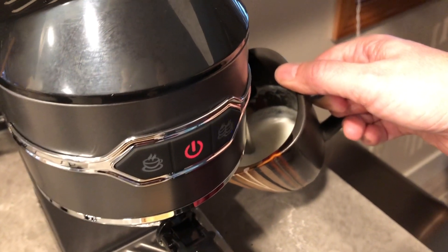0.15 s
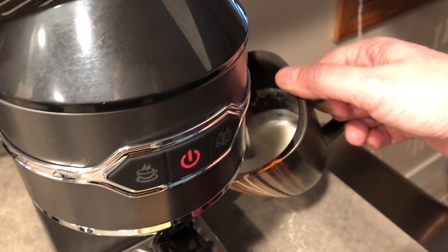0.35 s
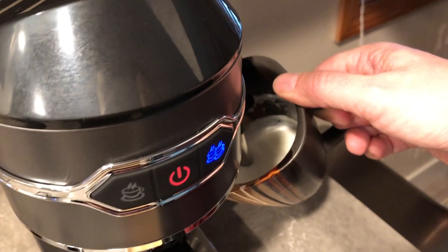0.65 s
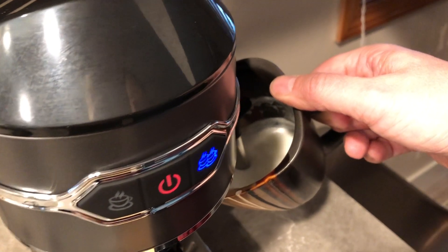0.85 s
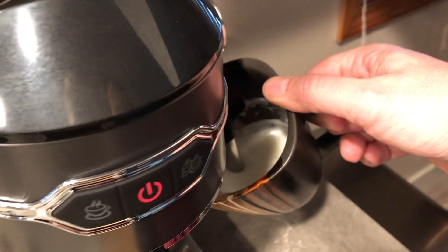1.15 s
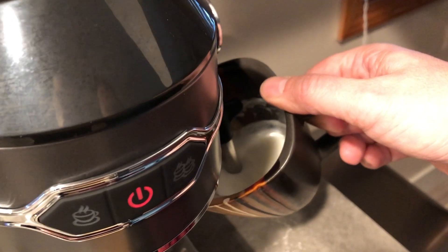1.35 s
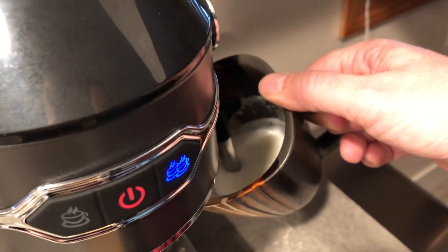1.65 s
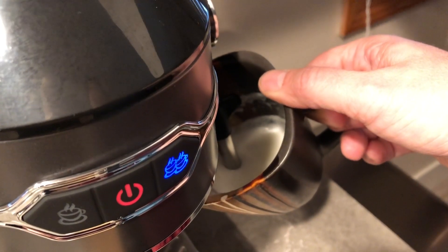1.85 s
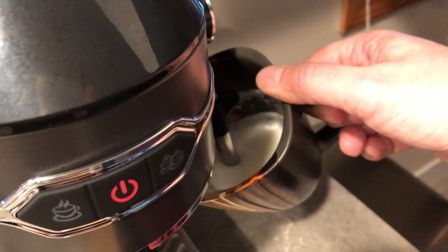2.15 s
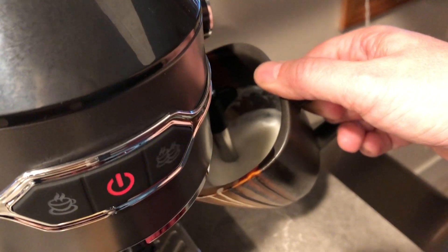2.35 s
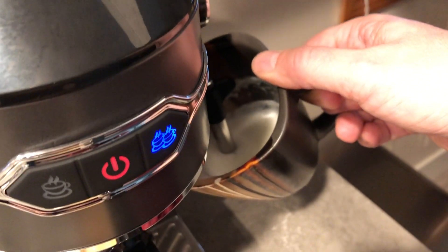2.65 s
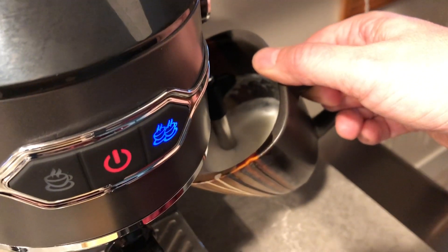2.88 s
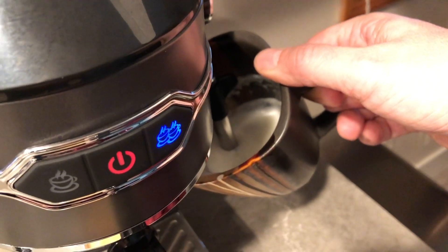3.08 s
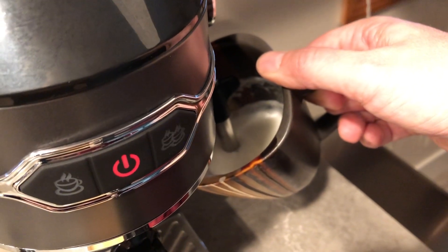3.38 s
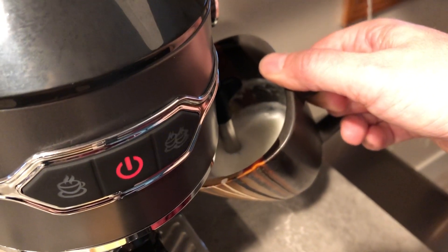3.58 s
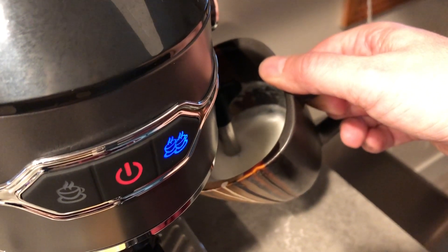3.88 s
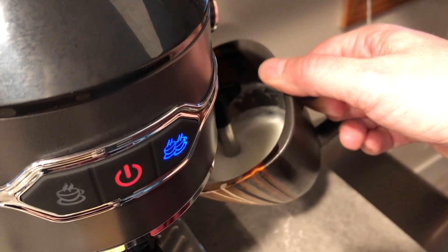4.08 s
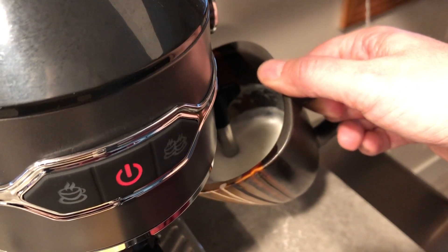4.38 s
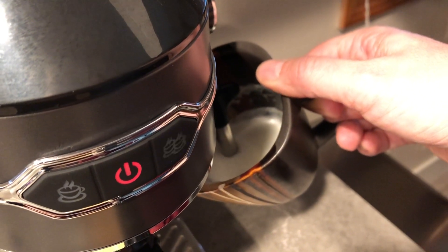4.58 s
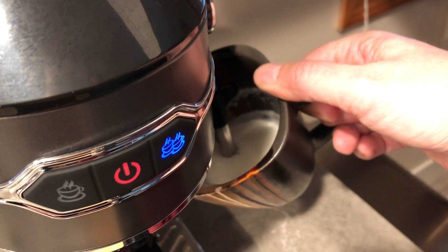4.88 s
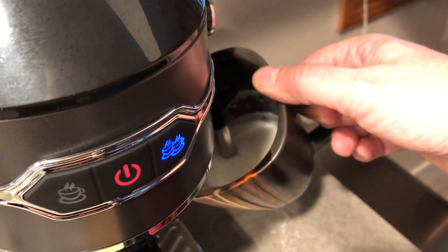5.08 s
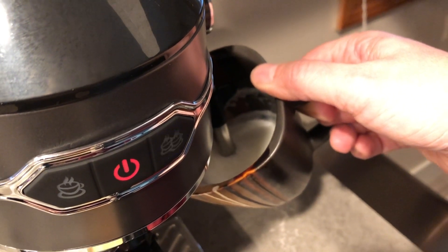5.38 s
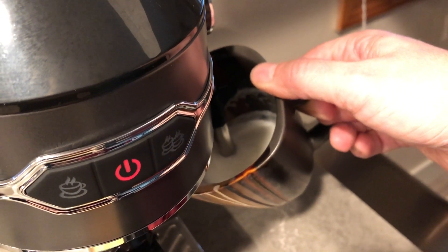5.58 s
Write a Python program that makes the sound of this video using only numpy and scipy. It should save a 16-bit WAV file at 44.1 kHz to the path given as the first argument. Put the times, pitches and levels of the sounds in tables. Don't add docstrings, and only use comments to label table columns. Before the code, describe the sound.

A close phone microphone in a quiet kitchen with little echo and a faint low hush. From 0 to 1 second, water dribbles from a steam wand: irregular, tiny wet ticks and sizzling crackles, many per second, lightly ringing a steel pitcher. Around 1.0 a soft thud, a sharper tick and quick falling plops mark the valve opening. At about 1.15 steam blasts out with a loud, coarse, spitting rasp that clears by 1.5. Until 4.4 the milk froths: steady metallic hiss, bubbling pockets swelling and ringing about eight times a second, gulps, and short bright spits, with faint thuds near 3.7 and 4.05. Around 4.5 the tip sinks; the hiss gets darker and smoother. From 4.75 a squeal near 850 to 900 hertz breaks in, stuttering at first, quickly growing loud, rough and wavering, with a faint octave, dominating until the abrupt stop at about 5.7.

```python
import sys
import numpy as np
from scipy import signal
from scipy.io import wavfile
from scipy.ndimage import uniform_filter1d

SR = 44100
rng = np.random.default_rng(int(sys.argv[2]) if len(sys.argv) > 2 else 0)


def pcm_store(signal):
    levels = np.round(np.clip(np.atleast_2d(signal), -1, 1) * 32767)
    wavfile.write(sys.argv[1], SR, levels.astype(np.int16).T)


def boost_factor(decibels):
    exponent = np.asarray(decibels, float) / 20
    return 10 ** exponent


N = 252693
T = np.arange(N) / SR
HZ = np.fft.rfftfreq(8192, 1 / SR)

# (time [s], flow level [dB], cavity resonance [Hz])
FLOW = [(0, -63.5, 2900), (0.55, -56.5, 2670), (0.78, -59, 2530), (0.9, -53, 2425), (1.135, -50, 2380),
        (1.17, -31.5, 2272), (1.262, -34.5, 2136), (1.275, -31, 1986), (1.405, -30, 2030),
        (1.425, -34.5, 2250), (1.9, -37, 2683), (3, -36.5, 2900), (3.75, -34, 2929), (4.4, -37.5, 2566),
        (4.52, -34, 1814), (4.71, -32.5, 1772), (4.76, -32.5, 1723), (5.73, -25, 1810)]
# (begins [s], takes [s], froth [dB], pocket [dB], fizz [dB])
STAGES = [
    (0, 0.01, -15, -4, -4),
    (1.1, 0.12, -32, -9, -10),
    (1.38, 0.12, -19, -6, -11),
    (4.42, 0.1, -22, -1, -17),
    (4.72, 0.03, -12, 3, -17),
]
SETTLES_S, SINKS_S = 1.6, 4.57
# (frequency [Hz], width [Hz], level [dB])
PITCHER_MODES = [(479, 54, -24), (852, 35, -10), (1770, 80, -13), (2050, 35, -7.5), (2900, 87, -4),
                 (4500, 30, -12), (5414, 145, -9), (6200, 62, -5), (7030, 207, -5), (8470, 140, -10),
                 (10900, 150, -37), (11290, 176, -13.5), (12700, 250, -22), (12900, 77, -14),
                 (13500, 360, -34), (14900, 700, -21)]
# (frequency [Hz], density [dB per Hz])
JET_COLOUR = [(150, -55), (250, -107), (872, -7.5), (1550, -26), (2790, -0.5), (4020, -16.5), (15800, -34)]
# (frequency [Hz], density [dB per Hz])
DEEP_COLOUR = [(180, -101), (300, -69), (699, -32), (868, 0), (1210, -26.5), (1600, -36), (1800, -26.5),
               (2230, -28.5), (3220, -23), (3930, -43), (4340, -29.5), (4880, -36), (7020, -31),
               (15800, -58.5)]

# (centre [s], level [dB], pitch [Hz], length [s])
SPUTTER = [(1.115, -37, 1095, 0.014), (1.145, -30, 1000, 0.0096), (1.16, -24, 990, 0.0088),
           (1.178, -24, 984, 0.011), (1.202, -28.5, 1140, 0.018), (1.225, -24, 1130, 0.01),
           (1.245, -18, 1144, 0.0089), (1.291, -29, 1151, 0.016), (1.424, -28, 1024, 0.022),
           (1.458, -28, 890, 0.028), (1.533, -29, 890, 0.03), (1.602, -30, 901, 0.017)]
# (centre [s], pocket level [dB], cavity level [dB], pocket pitch [Hz], length [s])
SWELLS = [(1.546, -43, -31, 885, 0.029), (1.635, -46, -35, 901, 0.029), (1.719, -34, -38, 950, 0.033),
          (1.81, -39, -37, 952, 0.033), (1.919, -37, -32, 958, 0.026), (2.15, -33, -41, 954, .035),
          (2.34, -33, -42.5, 901, .035), (2.839, -34.5, -45, 870, 0.038), (2.9, -31, -28, 1180, .014),
          (1.946, -56, -31, 900, 0.023), (2.014, -33.5, -32.5, 950, 0.043), (2.191, -36, -33, 950, 0.03),
          (2.271, -33, -31.5, 912, 0.04), (2.399, -33, -57, 1000, 0.052), (2.434, -40, -28, 1050, 0.02),
          (2.552, -27.5, -40, 884, 0.014), (2.614, -29.5, -29, 956, 0.039), (2.742, -30, -28.5, 900, 0.054),
          (2.881, -39, -30.5, 1100, 0.044), (3.019, -35.5, -28, 950, 0.053), (3.237, -30, -29, 1030, 0.045),
          (3.283, -55, -33.5, 1000, 0.013), (3.417, -29, -30.5, 1060, 0.058),
          (3.554, -26.5, -32, 1010, 0.047), (3.674, -31, -29, 1040, 0.03), (3.732, -27.5, -62, 950, .055),
          (3.787, -29.5, -37, 948, 0.022), (3.89, -29, -35, 980, 0.045), (4.038, -28.5, -56, 1047, 0.022),
          (4.174, -29, -28, 924, 0.061), (4.284, -30.5, -29, 1030, 0.063), (4.37, -39, -29, 1000, 0.015),
          (4.572, -30, -57, 1020, 0.094)]
POCKET_GLIDE, POCKET_LAG_S = 0.052, 0.002787
# (centre [s], level [dB], length [s])
CAVITY_RINGS = [
    (4.6, -34, 0.11),
    (4.787, -28.5, 0.08),
]
LIFT_ENDS_S, CLIMB, SAG = 3.8, 1.03, .93
# (centre [s], level [dB], pitch [Hz], length [s])
CAVITY_SHOTS = [(1.160, -26, 1750, 0.0062), (1.177, -32, 3040, 0.011), (1.179, -30, 1900, 0.0048),
                (1.204, -33, 2640, 0.0095), (1.226, -26, 1670, .006), (1.268, -31, 3170, .005),
                (1.272, -20.5, 2570, 0.0073), (1.278, -21, 1820, 0.0099), (1.294, -20, 1890, .006),
                (1.302, -28, 1980, .004), (1.311, -22, 1890, 0.016), (1.323, -18.5, 1980, 0.0057),
                (1.328, -20, 1940, 0.01), (1.344, -22, 2080, .008), (1.355, -22, 2100, 0.0088),
                (1.366, -18, 2000, 0.0082), (1.381, -23, 2120, 0.0044), (1.387, -25, 2050, .006),
                (1.399, -24, 2040, 0.0085), (1.41, -27, 2850, 0.0067), (1.431, -24.5, 1800, .004),
                (1.447, -24.5, 2500, 0.0073), (1.466, -29.5, 1906, .012), (1.988, -26, 2760, .006),
                (2.435, -21.5, 2866, 0.0095), (2.606, -28, 3020, 0.007), (2.873, -19, 2962, .012),
                (4.765, -29, 1757, .012), (4.827, -23.5, 1710, .012)]
# (time [s], level [dB])
BURSTS = [(1.589, -57), (1.781, -56), (1.864, -49), (1.973, -46.5), (2.079, -44), (2.196, -46),
          (2.302, -44.5), (2.441, -51), (2.547, -47.5), (2.665, -44.5), (2.791, -44), (2.945, -42.5),
          (3.06, -44.5), (3.159, -43), (3.207, -54), (3.311, -43.5), (3.471, -40.5), (3.63, -42.5),
          (3.709, -40.5), (3.825, -39.5), (3.949, -46.5), (4.051, -41), (4.216, -44), (4.362, -45),
          (4.454, -44.5), (4.701, -44.5)]
GULP_LAG_S, GULP_S = 0.034, 0.05

# (time [s], pitch [Hz])
SQUEAL_PITCH = [(4.73, 849), (5.0, 850.7), (5.1, 878), (5.3, 890.5), (5.4, 909), (5.47, 884), (5.53, 903.6),
                (5.58, 855), (5.72, 846.6)]
SQUEAL_DB, SQUEAL_WEAK_DB, SQUEAL_GROWS_S = -22.5, -7, 0.2
# (centre [s], level [dB], length [s])
SURGES = [(4.748, -21, 0.013), (4.801, -16, 0.0079), (4.818, -18.5, 0.014), (4.839, -15.5, .012),
          (4.867, -15, 0.0079), (4.884, -18, 0.012), (4.901, -13, 0.0083), (4.921, -14.5, .012),
          (4.942, -16, 0.0082), (4.96, -26, 0.01), (4.988, -17, .015), (5.014, -20.5, .012),
          (5.034, -12.5, 0.014), (5.066, -9.5, .016), (5.088, -13.5, .017), (5.125, -12, 0.023),
          (5.158, -13, 0.034), (5.19, -14, 0.047), (5.232, -11, 0.024), (5.253, -13, 0.019),
          (5.281, -14.5, 0.022), (5.302, -19, .01), (5.331, -12, 0.037), (5.368, -12, 0.04),
          (5.411, -15, 0.015), (5.426, -13, 0.006), (5.455, -10.5, 0.025), (5.478, -13, .006),
          (5.495, -15, .015), (5.523, -12.5, .018), (5.542, -10.5, .01), (5.562, -6.5, 0.01),
          (5.586, -11, 0.0176), (5.616, -9.5, 0.018), (5.632, -10, 0.0055), (5.648, -12, 0.007),
          (5.672, -11, 0.024), (5.692, -8, 0.0072), (5.704, -17, 0.0042), (5.721, -11.5, .011)]
# (frequency [Hz], width [Hz], start level [dB], end level [dB])
SQUEAL_SKIRTS = [
    (593.5, 125, -40.5, -44.5),
    (1060, 137, -35.5, -33),
    (1380, 250, -38.5, -35.5),
]

# (centre [s], level [dB], length [s])
BLAST_SPITS = [(1.17, -51, 0.0052), (1.172, -35, 0.0087), (1.204, -36, 0.015), (1.222, -38, 0.0082),
               (1.275, -35, 0.011), (1.297, -44, .006), (1.307, -36.5, 0.011), (1.325, -42, .015),
               (1.345, -46, 0.0092), (1.362, -37, 0.011), (1.384, -42, 0.008), (1.402, -40, 0.0082),
               (1.41, -54, .006), (1.45, -46.5, .006), (1.479, -41, 0.022)]
# (onset [s], top peak level [dB], body level [dB])
PUFFS = [(1.502, -31, -41.5), (1.5671, -39, -40), (1.5801, -40, -41.5), (1.5996, -37, -48),
         (1.663, -40, -43.5), (1.6854, -31, -39), (1.749, -37, -40), (1.779, -38, -43), (1.834, -43, -42.5),
         (1.865, -29, -43), (1.968, -39, -42), (2.057, -40, -40), (2.083, -40.5, -40.5),
         (2.194, -38, -40.5), (2.2496, -43, -43.5), (2.2815, -32, -41), (2.314, -37.5, -39),
         (2.3443, -50, -42), (2.4028, -47, -49), (2.445, -37, -39), (2.487, -36, -39.5),
         (2.532, -39, -37.5), (2.5671, -43, -41.5), (2.6213, -42, -42), (2.6405, -33, -38),
         (2.665, -29, -37.5), (2.682, -32, -40), (2.7759, -31, -37.5), (2.824, -39, -43.5),
         (2.9166, -41, -35), (2.935, -39, -38.5), (2.96, -34, -39), (3.0411, -32, -39.5),
         (3.0763, -33, -41), (3.1019, -44, -56), (3.1531, -37, -42), (3.2077, -39.5, -37),
         (3.2598, -33, -40.5), (3.3075, -33, -38), (3.4578, -37, -42), (3.469, -33, -39.5),
         (3.494, -36.5, -38.5), (3.622, -32, -40.5), (3.676, -38, -45.5), (3.6913, -30.5, -40),
         (3.71, -38, -39), (3.7647, -47, -45), (3.7766, -41, -46), (3.822, -34, -43.5), (3.851, -42, -43.5),
         (3.9233, -40, -48), (3.9597, -34, -41), (4.033, -40.5, -44), (4.056, -35, -38), (4.2151, -40, -42),
         (4.3379, -41, -44.5), (4.3817, -43, -43), (4.44, -40, -41), (4.467, -41, -38.5),
         (4.694, -45, -41.5)]
PUFF_LENGTH_S, PUFF_GROWS_S_PER_DB, PUFF_WEAK_DB = .011, .0007, -42
PUFF_TOP_DB, PUFF_BODY_DB, WET_DB = -8, 3, -29
# (frequency [Hz], width [Hz], level [dB])
SPIT_MODES = [(4500, 160, 5.5), (6030, 410, 9.5), (8200, 560, 7), (10330, 880, -5)]
# (frequency [Hz], width [Hz], level [dB])
SPIT_TOP = [(13700, 550, 2), (14350, 800, 24)]

# (onset [s], peak level [dB], sizzle [Hz], decay [s])
TICKS = [(0.016, -43, 3700, 0.006), (0.037, -44, 3560, 0.0078), (0.065, -39, 3900, 0.0069),
         (0.0772, -30.5, 2910, 0.0081), (0.1087, -28.5, 3020, 0.0051), (0.1474, -38, 4650, 0.0068),
         (0.1675, -36, 4640, 0.0042), (0.177, -31, 4580, 0.0052), (0.2089, -40, 4260, 0.0068),
         (0.2384, -35, 4770, 0.0088), (0.258, -38, 3700, 0.0084), (0.275, -33, 2210, 0.006),
         (0.2837, -32, 2900, 0.006), (0.2964, -30, 3620, 0.007), (0.311, -30, 2880, 0.0057),
         (0.326, -34, 3640, 0.006), (0.3326, -32, 2230, 0.006), (0.3434, -34, 3600, 0.0072),
         (0.3556, -31, 3660, 0.0057), (0.397, -38, 3540, 0.0067), (0.4114, -27, 2170, 0.0065),
         (0.43, -37, 3530, 0.0054), (0.451, -38, 2070, 0.0071), (0.478, -28.5, 3220, 0.0063),
         (0.494, -31, 3220, 0.004), (0.5524, -38, 3540, 0.006), (0.5633, -32, 3530, 0.007),
         (0.578, -29, 3290, 0.006), (0.6006, -35, 2110, 0.0083), (0.614, -36, 2360, 0.009),
         (0.6584, -34, 2940, 0.0076), (0.6806, -36, 2450, 0.006), (0.7577, -33, 2460, 0.0064),
         (0.77, -38, 2470, 0.006), (0.802, -30.5, 2410, 0.0083), (0.8274, -48, 4190, 0.0044),
         (0.8608, -34, 2030, 0.006), (0.8774, -43, 3850, 0.0054), (0.8896, -29.5, 4070, 0.0066),
         (0.9128, -28.5, 2470, 0.009), (0.9597, -29.5, 2700, 0.0079), (0.9872, -30, 2390, 0.0093),
         (1.0237, -18, 3850, 0.0033), (1.063, -30, 2360, 0.006), (1.0884, -23, 2030, 0.0037),
         (1.1119, -24, 3050, 0.0047), (1.1271, -29, 3330, 0.006), (1.14, -18, 6030, 0.0037)]
# (frequency [Hz], density [dB per Hz])
TICK_COLOUR = [(180, -52), (300, -26), (688, -20), (868, -10.5), (1550, -16.5), (1830, 1), (2680, 3),
               (3740, 1), (4200, -1), (5950, -5.5), (6680, -10), (15800, -35.5)]
TICK_CREST_DB, TICK_WIDTH_HZ = -10, 1300
TICK_BROAD_DB, TICK_RING_DB = -2, -6.5

# (centre [s], level [dB], start pitch [Hz], end pitch [Hz], length [s])
PLOPS = [
    (1.029, -33.5, 1700, 800, 0.0041),
    (1.033, -38, 1790, 1480, 0.0098),
    (1.041, -33, 945, 800, 0.0085),
    (1.053, -31.5, 837, 860, 0.0084),
    (1.064, -40, 940, 900, .004),
    (1.071, -35.5, 900, 880, .004),
    (1.092, -37, 1090, 890, .006),
    (1.128, -35, 1110, 1000, .005),
]
# (centre [s], level [dB], length [s])
THUMPS = [
    (1.02, -49, 0.07),
    (3.686, -56, 0.046),
    (4.07, -50, 0.031),
]
# (time [s], level [dB])
KNOCKS = [
    (0.965, -44),
    (3.68, -57),
    (4.052, -56),
]
# (frequency [Hz], density [dB per Hz])
KITCHEN_COLOUR = [(12, -63), (20, -19), (107, 4.5), (510, -1), (844, -11.5), (1520, -30), (3810, -31),
                  (15800, -35)]
KITCHEN_DB = -61.5


def jet():
    cavity_db, cavity_hz = columns(FLOW)
    froth_db, pocket_db, fizz_db = cavity_db + np.array(stage_mix())
    steady = np.clip((T - SETTLES_S) / 0.094, 0, 1)
    deep = np.clip((T - SINKS_S) / 0.38, 0, 1)

    steel = modes(PITCHER_MODES, HZ)
    clearing_gain = np.sqrt(boost_factor(read(TICK_COLOUR, HZ)) ** 2 + boost_factor(9) * steel)
    shallow_gain = np.sqrt(steel + boost_factor(read(JET_COLOUR, HZ) - 3.5) ** 2)
    deep_gain = np.sqrt(boost_factor(-40.0) * steel + boost_factor(np.minimum(read(DEEP_COLOUR, HZ), -15)) ** 2)
    stages = [(1 - steady, clearing_gain), (steady - deep, shallow_gain), (deep, deep_gain)]

    grainy = np.interp(T, [1., 1.15, 1.5, 4.4, 4.55], [.4, .92, .75, .65, .35])
    unsteady = wander(N, 72).real
    drive = grainy * bubbles(per_s=200, cycles=9.8, spread_db=4.0)
    drive += np.sqrt(1 - grainy ** 2) * rng.standard_normal(N)
    drive *= boost_factor((5.0 - 1.85 * steady - 1.3 * deep) * unsteady)

    cavity_open = np.interp(T, [1.1, 1.25, 4.85, 5.], [0, 1, 1, 0])
    cavity = ring(cavity_hz * (1 + .025 * wander(N, 25).real), 480, 0)
    out = boost_factor(cavity_db - 3.0 + 3.4 * unsteady) * cavity_open * causal(cavity, band(1130, 3400))
    middle_db = cavity_db - 5.5 - 0.8 * cavity_open * (1 - steady)
    bands = [(froth_db, 280, 680), (pocket_db, 680, 1450), (middle_db, 1450, 3900), (fizz_db, 3900, 17000)]
    for db, lo, hi in bands:
        out += boost_factor(db) * sum(share * evened(causal(drive, gain * band(lo, hi))) for share, gain in stages)
    return out


def stage_mix():
    begins, takes, *levels = np.transpose(STAGES)
    curves = []
    for db in levels:
        steps = zip(np.diff(db), begins[1:], takes[1:])
        curves.append(db[0] + sum(step * np.clip((T - s) / d, 0, 1) for step, s, d in steps))
    return curves


def bubbles(per_s, cycles, spread_db):
    out = np.zeros(N)
    for hz in np.geomspace(300, 16000, 28):
        t = np.arange(round(3 * cycles * SR / hz ** 0.768 / 8)) / SR
        fade = t / t[-1] * 3
        drop = fade * np.exp(-2 * fade) * np.sin(2 * np.pi * hz * t * (1 + .015 * fade))
        clicks = crackle(per_s * hz / 3000, spread_db)
        out += np.sqrt(hz) * evened(signal.oaconvolve(clicks, drop)[:N])
    return evened(out)


def churned(x, patchy_db):
    z = signal.stft(x, nperseg=512, noverlap=384)[2]
    patches = uniform_filter1d(rng.standard_normal(z.shape), 5, 0)
    patches = evened(uniform_filter1d(patches, 16, 1))
    return signal.istft(z * boost_factor(patchy_db * patches), nperseg=512, noverlap=384)[1][:len(x)]


def squeal():
    hz, = columns(SQUEAL_PITCH)
    starts = SQUEAL_PITCH[0][0]
    on = np.clip((T - starts) / 0.045, 0, 1)
    db = SQUEAL_DB + SQUEAL_WEAK_DB * np.exp(-np.maximum(T - starts, 0) / SQUEAL_GROWS_S)
    surges = humps(*np.transpose(SURGES), stretch=1.81, skew=1.0, blunt=0.52)
    height = np.hypot(boost_factor(db - 3.0), surges)

    waver_hz = 33 * wander(N, 170).real
    unsteady = 1 + 0.14 * wander(N, 90) + 0.1 * wander(N, 450)
    swing = evened(unsteady * np.exp(2j * np.pi * np.cumsum(hz + waver_hz) / SR))
    tone = causal(on * height * evened(swing.real), band(585, 1340))
    for f, width, start_db, end_db in SQUEAL_SKIRTS:
        skirt_db = np.interp(T, [starts, T[-1]], [start_db, end_db])
        tone = tone + on * boost_factor(skirt_db) * ring(np.full(N, f), width, 0)

    wide = np.interp(T, [4.95, 5.15, 5.52, 5.62], [0, 1, 1, .2])
    octave = evened((swing * swing).real)
    return tone + causal(wide * boost_factor(-34.0) * octave, band(1580, 2100))


def rings():
    flow_s, _, flow_hz = np.transpose(FLOW)
    swelling = [(s, db, hz, hz, size) for s, db, hz, size in SPUTTER]
    for s, db, _, hz, size in SWELLS:
        swelling.append((s + POCKET_LAG_S, db, hz * (1 - POCKET_GLIDE), hz * (1 + POCKET_GLIDE), size))
    low = pockets(swelling, width_hz=302, steady=0.033, stretch=2.0, skew=1.2)

    shaken = []
    for s, db, size in CAVITY_RINGS + [(s, db, size) for s, _, db, _, size in SWELLS]:
        hz = np.interp(s, flow_s, flow_hz)
        shaken.append((s, db, hz * .98, hz * (CLIMB if s < LIFT_ENDS_S else SAG), size))
    high = pockets(shaken, width_hz=247, steady=0.58, stretch=1.7, skew=0.77)
    shots = [(s, db, hz, hz, size) for s, db, hz, size in CAVITY_SHOTS]
    high += pockets(shots, width_hz=300, steady=0.77, stretch=1.7, skew=.7)

    closing = [(s + GULP_LAG_S, db, 470, 490, GULP_S) for s, db in BURSTS]
    gulps = pockets(closing, width_hz=168, steady=0.047, stretch=1.9, skew=0.98)
    return causal(low, band(788, 1385)) + causal(high, band(1365, 4020)) + gulps


def pockets(table, width_hz, steady, stretch, skew):
    out = np.zeros(N)
    for s, db, start_hz, end_hz, length in table:
        size = round(stretch * length * SR)
        tone = ring(np.linspace(start_hz, end_hz, size), width_hz, steady)
        add(out, s - size / SR * .5 ** (1 / skew), boost_factor(db) * tone * swell(size, skew))
    return out


def spits():
    rows = [(s, db + WET_DB, db, size) for s, db, size in BLAST_SPITS]
    for s, top, body in PUFFS:
        size = PUFF_LENGTH_S + PUFF_GROWS_S_PER_DB * max(top - PUFF_WEAK_DB, 0)
        rows.append((s + size / 3, top + PUFF_TOP_DB, body + PUFF_BODY_DB, size))
    s, top_db, body_db, length = np.transpose(rows)
    hiss = boost_factor(3.0 * wander(N, 200).real) * rng.standard_normal(N)
    upper = evened(causal(hiss, np.sqrt(modes(SPIT_TOP, HZ)) * band(13300, 15600)))
    lower = evened(causal(hiss, np.sqrt(modes(SPIT_MODES, HZ)) * band(3800, 12500)))
    return humps(s, top_db, length, 1.5, .95) * upper + humps(s, body_db, length, 1.3, .95) * lower


def dribble():
    clicks = crackle(per_s=6800, spread_db=3.5)
    broad = evened(causal(clicks, boost_factor(read(TICK_COLOUR, HZ)) * band(0, 10000)))
    sizzle, shape = np.zeros(N), np.zeros(N)
    t = np.arange(2000) / SR
    for s, db, hz, decay in TICKS:
        fade = boost_factor(db + TICK_CREST_DB) * np.minimum(t / .001, 1) * np.exp(-t / max(decay, 1e-3))
        falling_hz = hz * (1 - 8 * np.minimum(t, .02))
        add(sizzle, s - .001, fade * ring(falling_hz, TICK_WIDTH_HZ, 0.22))
        add(shape, s - .001, fade)
    hits = shape * rng.standard_normal(N)
    pitcher = causal(hits, np.sqrt(modes([(880, 85, 0)], HZ)) * band(704, 1050))
    pitcher = evened(pitcher) * np.std(hits)
    return causal(sizzle, band(2150, 10700)) + boost_factor(TICK_BROAD_DB) * shape * broad + boost_factor(TICK_RING_DB) * pitcher


def plops_and_puffs():
    rumble = evened(causal(rng.standard_normal(N), band(140, 260)))
    plop = pockets(PLOPS, width_hz=250, steady=0.6, stretch=1.9, skew=0.6)
    return plop + rumble * humps(*np.transpose(THUMPS), stretch=1.226, skew=0.71)


def knock():
    out, t = np.zeros(N), np.arange(4500) / SR
    thud = np.sin(2 * np.pi * 155 * t) * signal.windows.tukey(len(t), .4) * boost_factor(-150 * t)
    for s, db in KNOCKS:
        add(out, s, boost_factor(db) * thud)
    return out


def walls(x):
    taps, at = np.zeros(SR // 2), np.arange(200, SR // 2 - 22, 22)
    taps[at + rng.integers(0, 22, len(at))] = rng.choice([-1., 1.], len(at))
    taps *= boost_factor(-60 * np.arange(len(taps)) / SR / 0.23)
    return signal.fftconvolve(x, taps / np.linalg.norm(taps))[:N]


def kitchen():
    noise = causal(rng.standard_normal(N + 4096), boost_factor(read(KITCHEN_COLOUR, HZ)))[4096:]
    return boost_factor(KITCHEN_DB) * evened(noise)


def evened(x):
    return x / np.sqrt(np.mean(abs(x) ** 2) + 1e-20)


def read(points, hz):
    f, value = np.transpose(points)
    return np.interp(np.log(hz + 1), np.log(f + 1), value)


def columns(rows):
    s, *rest = np.transpose(rows)
    return [np.interp(T, s, c) for c in rest]


def add(mix, s, sound):
    part = mix[max(round(s * SR), 0):][:len(sound)]
    part += sound[:len(part)]


def wander(size, width_hz):
    r = np.exp(-np.pi * width_hz / SR)
    z = rng.standard_normal((size + 2000, 2)) @ [1, 1j]
    return evened(signal.lfilter([1], [1, -2 * r, r * r], z)[2000:])


def ring(hz, width_hz, steady):
    z = wander(len(hz), width_hz)
    z = z / abs(z) ** np.clip(steady, 0, 1)
    return evened((z * np.exp(2j * np.pi * np.cumsum(hz) / SR)).real)


def modes(table, hz):
    return sum(boost_factor(db) ** 2 / (1 + (2 * (hz - f) / w) ** 2) for f, w, db in table)


def band(lo_hz, hi_hz):
    return 1 / np.sqrt((1 + (lo_hz / (HZ + 1)) ** 16) * (1 + (HZ / hi_hz) ** 16))


def causal(x, gain):
    log_gain = np.log(np.maximum(gain / gain.max(), 1e-5))
    circle = np.concatenate([log_gain, log_gain[-2:0:-1]])
    taps = np.fft.ifft(np.exp(np.conj(signal.hilbert(circle)))).real[:4096]
    return signal.oaconvolve(x, taps)[:len(x)]


def crackle(per_s, spread_db):
    size = boost_factor(spread_db * np.minimum(rng.exponential(1, N), 3.3)) * rng.standard_normal(N)
    return evened(size * (rng.random(N) < per_s / SR))


def swell(size, skew):
    return np.sin(np.pi * np.linspace(0, 1, size) ** skew) ** 2


def humps(times, levels_db, lengths, stretch, skew, blunt=1):
    power = np.zeros(N)
    for s, db, length in zip(times, levels_db, lengths):
        size = round(stretch * length * SR)
        add(power, s - size / SR * .5 ** (1 / skew), (boost_factor(db) * swell(size, skew) ** blunt) ** 2)
    return np.sqrt(power)


def scene():
    steam = churned(jet(), patchy_db=2.6) + spits() + squeal() + rings()
    near = causal(steam + dribble(), band(300, 19000)) + knock() + plops_and_puffs()
    return (near + boost_factor(-12.0) * walls(near) + kitchen())[None]


def band_limit(x):
    return signal.sosfilt(signal.butter(12, 15840, fs=SR, output="sos"), x)


def record(dry):
    mix = dry * np.minimum((T[-1] - T) / .004, 1)
    return band_limit(mix)


dry = scene()
out = record(dry)
pcm_store(out)
```